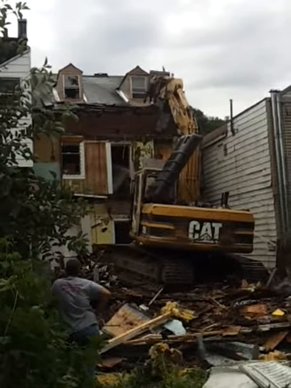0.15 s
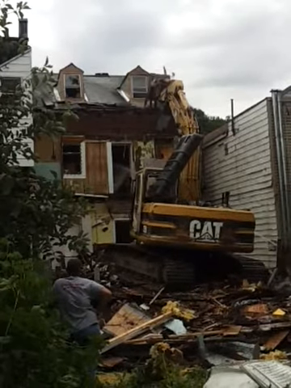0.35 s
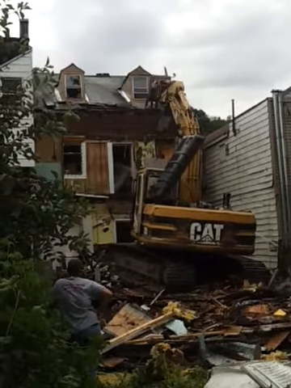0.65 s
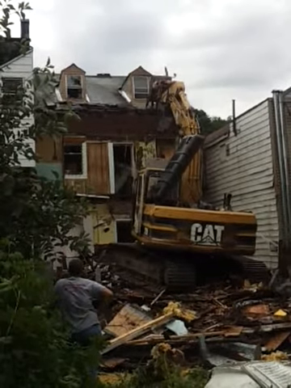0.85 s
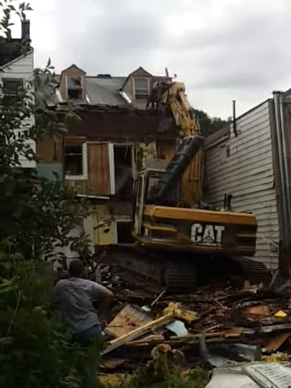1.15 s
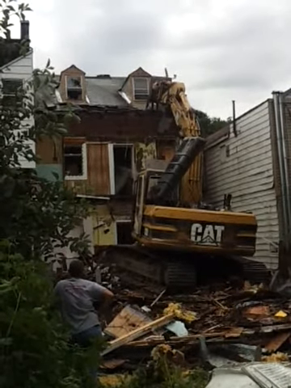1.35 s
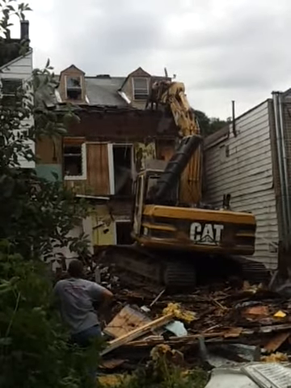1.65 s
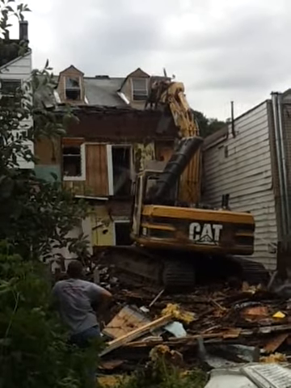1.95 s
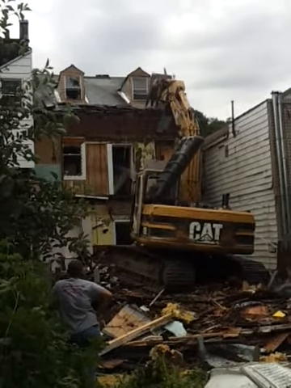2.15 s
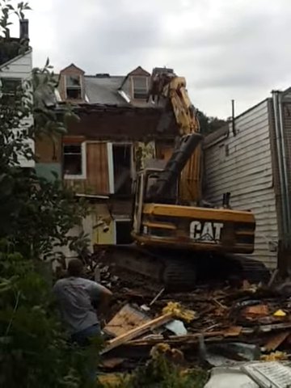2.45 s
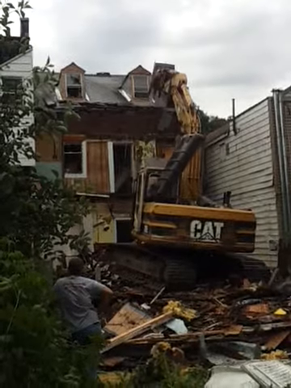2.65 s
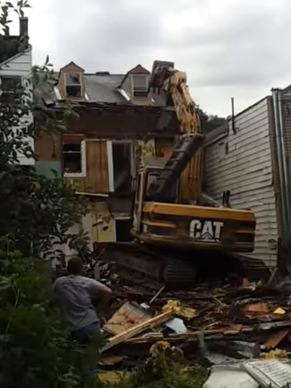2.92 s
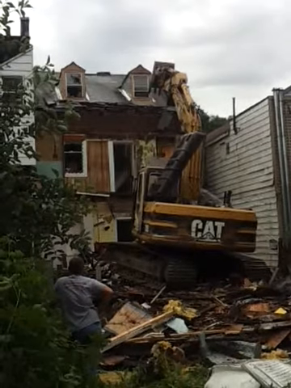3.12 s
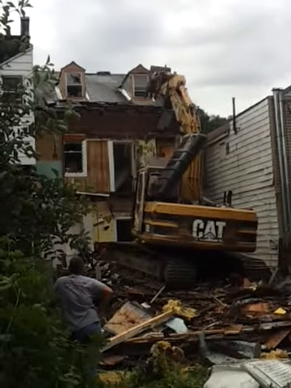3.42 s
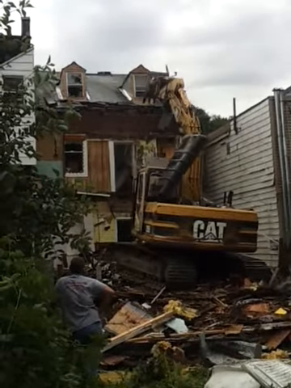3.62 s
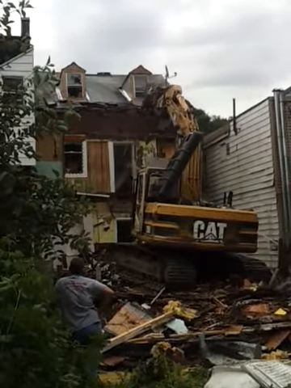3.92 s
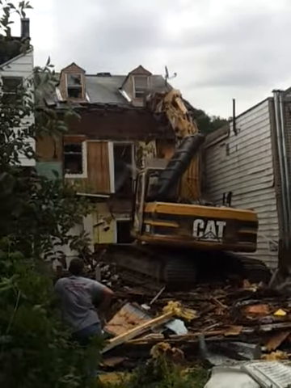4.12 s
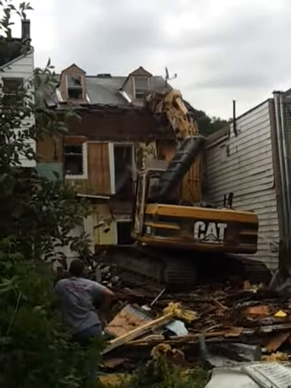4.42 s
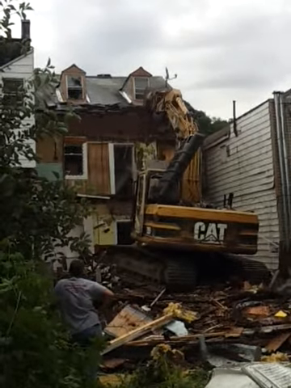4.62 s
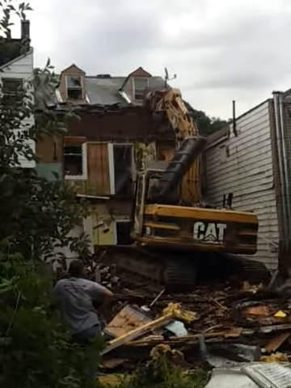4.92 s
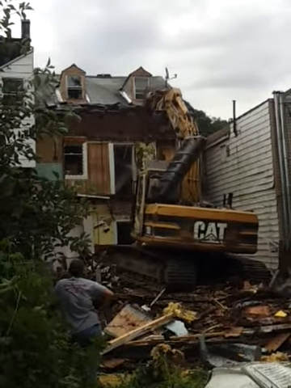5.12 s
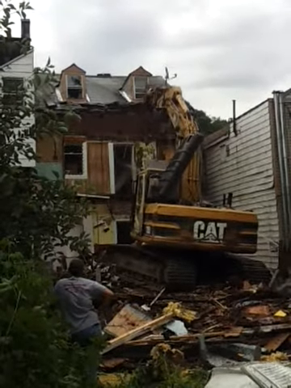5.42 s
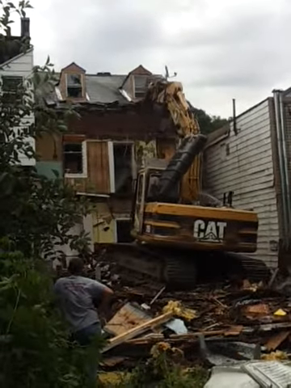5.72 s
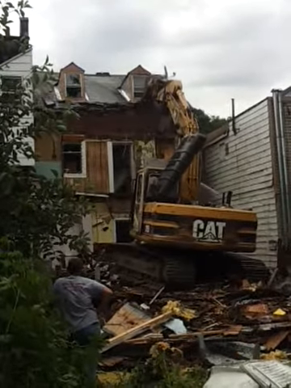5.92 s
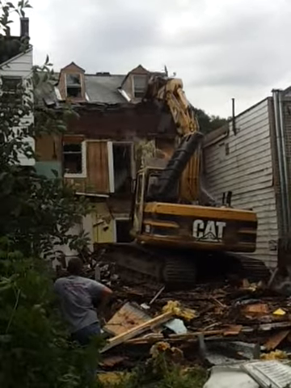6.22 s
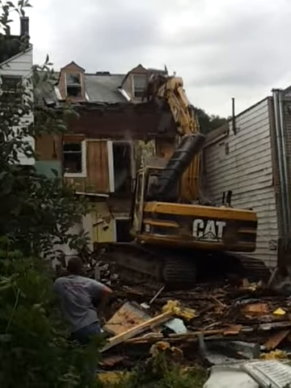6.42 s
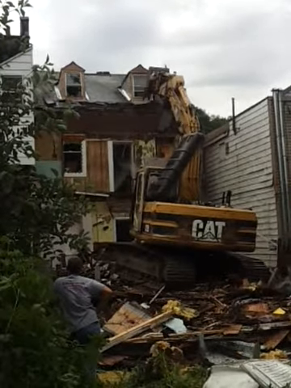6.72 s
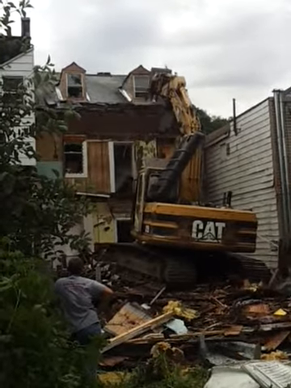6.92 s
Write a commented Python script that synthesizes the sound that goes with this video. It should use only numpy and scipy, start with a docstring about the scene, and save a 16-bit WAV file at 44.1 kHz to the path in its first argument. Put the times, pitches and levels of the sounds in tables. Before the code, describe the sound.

Outdoors, some metres away, a large diesel excavator booms steadily under load, with fan hum, pump whine and oil hiss swelling at each arm movement. A beam cracks early, grit slides, then a dense volley of timber cracks and low thumps hits near four seconds. Smaller cracks and bright snaps follow near six. A handheld phone picks it up in stereo, the peaks clipping.

```python
"""A six-cylinder diesel excavator works beside a timber house, some metres from a phone's two microphone ports.
From the start the exhaust booms at the firing rate, fan and piston pump sing on multiples of the engine cycle,
and oil noise swells with each valve stroke. A beam cracks early; splinters snap and grit slides in the middle,
where the densest cracks come about four seconds in. More cracks and snaps follow, then a last slide of grit.
Tones are sines, rough sounds are coloured noise, beams are decaying modes; the highest peaks clip."""
import sys
import numpy as np
from scipy import signal
from scipy.fft import rfft, irfft, next_fast_len
from scipy.io import wavfile
from scipy.ndimage import uniform_filter1d, map_coordinates

SR = 44100
rng = np.random.default_rng(int(sys.argv[2]) if len(sys.argv) > 2 else 0)


def master_out(mix):
    """Clip the mix to full scale and print it as 16-bit PCM to the path in sys.argv[1]."""
    frames = np.transpose(np.atleast_2d(mix))
    ceiling = np.clip(frames, -1, 1)
    pcm = np.round(ceiling * 32767).astype(np.int16)
    wavfile.write(sys.argv[1], SR, pcm)


N = 311325
TIME = np.arange(N) / SR
FFT_SIZE = next_fast_len(N)
BINS = np.arange(FFT_SIZE // 2 + 1) * SR / FFT_SIZE

CYLINDERS = 6  # firings in one engine cycle
MIDDLING_FLOW_DB = -32  # oil flow at which hiss and roar have their stated levels

# Blows that break the beams.
# Each row: start in seconds, peak level in dB, pitch in Hz, thump level in dB.
CRACKS = [(0.42, -12.5, 1340, -23), (0.437, -12, 744, -15), (0.469, -14, 1220, -14),
          (3.782, -11, 1270, -26), (3.819, -5.5, 990, -27), (3.859, -17, 1290, -34),
          (3.963, -9.5, 1190, -30), (3.99, -15, 1280, -30), (4.068, -11, 900, -22),
          (4.092, -7.5, 1530, -10), (4.115, -6.5, 1540, -22), (4.139, -10.5, 1170, -31),
          (4.159, -8.5, 1080, -20), (4.182, -6, 1300, -16), (4.211, -12.5, 1140, -6.5),
          (4.229, -10, 770, -11), (4.257, -9, 990, -17), (5.607, -15, 1030, -28), (5.743, -12, 729, -35),
          (5.974, -14, 950, -26), (5.989, -8, 1360, -26), (6.027, -17, 1040, -26)]


def undb(db):
    """Decibels to gain."""
    return 10 ** (np.asarray(db) / 20)


def unit(x):
    """Scale to rms 1."""
    return x / np.sqrt(np.mean(x ** 2))


def noise():
    """Unrelated white noise for mid and side."""
    return rng.standard_normal((2, N))


def curve(table):
    """A (seconds, value) table read sample by sample."""
    seconds, values = np.transpose(table)
    return np.interp(TIME, seconds, values)


def shape(table):
    """A (Hz, dB) table read at every frequency, on a log frequency scale."""
    hz, db = np.transpose(table)
    return np.interp(np.log(BINS + 1), np.log(hz), db)


def colour(x, db):
    """Filter by a gain curve in dB."""
    return irfft(rfft(x, FFT_SIZE) * undb(db), FFT_SIZE)[..., :N]


def walk(rate):
    """Random levels held 1 / rate s and slewed twice; spread near 1."""
    hold = int(SR / rate)
    steps = np.repeat(rng.standard_normal(N // hold + 1), hold)
    return 1.95 * uniform_filter1d(uniform_filter1d(steps, hold), hold)[:N]


def tones(cycle, orders, dbs, waver_db, rate):
    """Sines on multiples of the engine cycle, each wavering; the side copy runs a quarter turn off."""
    out = np.zeros((2, N))
    for order, db in zip(orders, dbs):
        turn = 2 * np.pi * (order * cycle + rng.random() + 0.01 * walk(rate))
        level = np.sqrt(2) * undb(db + waver_db * walk(rate))
        out += level * np.array([np.sin(turn), np.cos(turn)])
    return out


def clatter(turns, keep, size=4096):
    """Noise that partly repeats every turn: the same parts knock at the same angles."""
    fresh = rng.standard_normal((2, int(turns[-1]) + 1, size))
    # each turn keeps a share of the pattern before it
    pattern = signal.lfilter([1], [1, -keep], fresh, axis=1).reshape(2, -1)
    return unit(np.array([np.interp(turns * size, np.arange(len(p)), p) for p in pattern]))


def swells(table, column, idle_db, close_s):
    """Level in dB of sounds that open, hold and close over a quiet bed; they add in power."""
    open_s = 0.016
    power = undb(idle_db) ** 2
    for row in table:
        start, end = row[0], row[1]
        # a sound that starts at zero is already open
        corners = [start - (start == 0), start + open_s, end, end + close_s]
        gate = np.interp(TIME, corners, [0, 1, 1, 0])
        power = power + (gate * undb(row[column])) ** 2
    return 10 * np.log10(power)


def add(out, s, sound):
    """Mix a short sound in at time s."""
    k = int(s * SR)
    out[:, k:k + sound.shape[1]] += sound[:, :N - k]


def showers():
    """Small fragments slide off the roof: dense bright grains of grit and shingle as flickering noise."""
    # Each row: start in seconds, end in seconds, level in dB.
    slides = [(2.55, 3.2, -34.5), (3.3, 3.62, -33), (3.72, 4.0, -30.5), (4.06, 4.22, -39),
              (4.55, 4.95, -36), (6.25, 6.5, -35.5)]
    # Spectrum of the grit. Each row: frequency in Hz, relative level in dB.
    grit = [(2000, 5), (4000, -1.5), (7500, 2), (10500, -1), (12400, -5), (14500, -19)]
    grains = undb(1.4 * walk(120)) * noise()
    level_db = swells(slides, column=2, idle_db=-46, close_s=0.17)
    return undb(level_db) * unit(colour(grains, shape(grit)))


def debris():
    """After each crack, falling pieces crunch: flickering noise that rises fast and dies away."""
    # Spectrum of the crunch. Each row: frequency in Hz, relative level in dB.
    spectrum = [(20, 7), (60, 9), (120, 1), (300, 7), (1500, 5), (1800, -15), (2300, -8.5), (4000, -19.5),
                (8000, -26), (12000, -44)]
    below_crack_db, t60_s, rise_s = -8.5, 0.25, 0.0023
    power, t = np.zeros((2, N)), TIME[:16384]
    for s, db, _, _ in CRACKS:
        fall = undb(db + below_crack_db) * 1000 ** (-t / t60_s)
        # unrelated falls add in power
        add(power, s, np.tile(fall ** 2 * (1 - np.exp(-t / rise_s)), (2, 1)))
    grains = unit(undb(2.0 * walk(150)) * noise())
    tint = shape(spectrum)
    return colour(np.sqrt(power) * grains, tint) / np.sqrt(np.mean(undb(tint) ** 2))


def snaps():
    """Splinters and glass: short bright bursts of band-limited noise with a tail."""
    # Each row: start in seconds, level in dB before the band filter, pitch in Hz, 60 dB decay in seconds.
    bursts = [(2.1894, -22, 6670, 0.09), (2.9494, -28, 7000, 0.092), (3.4955, -26, 10000, 0.084),
              (3.7994, -22, 7350, 0.1), (3.8594, -28, 8560, 0.1), (4.1094, -28, 7100, 0.1),
              (5.6094, -19.5, 7380, 0.08), (5.88, -18, 7380, 0.088), (5.8964, -19, 7380, 0.09)]
    out, t = np.zeros((2, N)), TIME[:8192]
    for s, db, hz, t60 in bursts:
        edges = np.clip([hz / 4.3, hz * 1.46], 100, .45 * SR)
        band = signal.butter(3, edges, "band", fs=SR, output="sos")
        burst = signal.sosfilt(band, rng.standard_normal((2, len(t))))
        add(out, s, undb(db) * burst * 1000 ** (-t / t60) * (1 - np.exp(-t / 0.0018)))
    return out


def cracks():
    """Fibres tear for some milliseconds and ring the beam's decaying modes, with a low thump below."""
    # Modes of the beams. Each row: frequency in Hz, 60 dB decay in seconds.
    timber = [(430, 0.14), (620, 0.017), (770, 0.17), (1030, 0.034), (1180, 0.096), (1320, 0.11),
              (1540, 0.036)]
    spread_db = -10  # per octave between a mode and the pitch of the blow
    scatter = .025  # each broken piece is tuned a little differently
    out, t = np.zeros((2, N)), TIME[:16384]
    mode_hz, t60 = (c[:, None] for c in np.transpose(timber))
    for s, db, hz, thump_db in CRACKS:
        tear = rng.standard_normal((2, 1024)) * np.exp(-t[:1024] / 0.0053)
        # each blow wakes most the modes near its own pitch
        mode_db = spread_db * np.abs(np.log2(mode_hz / hz))
        piece_hz = mode_hz * (1 + scatter * rng.standard_normal(mode_hz.shape))
        modes = undb(mode_db) * np.sin(2 * np.pi * piece_hz * t) * 1000 ** (-t / t60)
        ring = signal.fftconvolve(tear, modes.sum(axis=0)[None])[:, :len(t)]
        ring /= np.abs(ring).max(axis=1, keepdims=True)
        thump = np.sin(2 * np.pi * rng.uniform(170.6, 222) * t)
        thump *= 1000 ** (-t / 0.1) * (1 - np.exp(-t / 0.0025))
        add(out, s, undb(db) * ring + undb(thump_db) * thump)
    return out


def strokes(column, idle_db):
    """Level in dB of one pump or oil sound as valves open and close to move the arm."""
    # Each row: opens in seconds, closes in seconds, then levels in dB of the pump whine, the oil flow
    # and the tenth piston tone.
    valves = [(0, .09, -34, -28.5, -45), (.11, .21, -32, -30, -39), (.21, .3, -40, -38, -45),
              (.3, .65, -35, -31, -45), (.79, 1.01, -28.5, -26.5, -43), (1.06, 1.24, -31.5, -30, -41),
              (1.24, 1.38, -43, -43, -41), (1.75, 1.81, -40, -51, -48), (1.97, 2.55, -31.5, -35.5, -44),
              (2.49, 2.76, -28, -32, -46), (2.59, 2.76, -33, -28, -46), (2.76, 2.86, -44, -35, -48),
              (3.19, 3.31, -29.5, -31, -41), (3.37, 3.63, -36, -38.5, -43), (4.06, 4.2, -42, -26.5, -48),
              (4.27, 4.48, -27, -34, -43), (4.48, 4.79, -32.5, -28.5, -52), (4.91, 5.74, -32, -33.5, -45),
              (5.8, 6.4, -33.5, -35, -52), (6.42, 7.06, -33, -27, -48), (6.48, 6.8, -45, -40, -34.5),
              (6.92, 7.06, -31, -38, -37)]
    return swells(valves, column, idle_db, close_s=.045)


def covers(whine_db):
    """Machine covers ring as narrow noise bands, a little harder while the pump whines."""
    # Each row: frequency in Hz, width in Hz, level in dB.
    panels = [(3368, 40, -43), (6260, 200, -42)]
    rings = np.zeros((2, N))
    for hz, width, db in panels:
        peak_db = -20 * np.log10(1 + (2 * (BINS - hz) / width) ** 2)
        rings += undb(db) * unit(colour(noise(), peak_db))
    return undb(0.17 * (whine_db - whine_db.mean())) * rings


def oil_hiss(flow_db):
    """Oil hisses through the valves: bright noise that grows gently with flow."""
    # Spectrum of the hiss. Each row: frequency in Hz, relative level in dB.
    spectrum = [(2000, -2.5), (4000, 5), (5500, -0.5), (6800, 2.5), (7600, 3.5), (8500, -0.5), (10500, -3),
                (11600, -5), (12400, -13), (14500, -67)]
    hiss_db, slope = -31.5, 0.28  # at middling flow; dB per dB of flow
    level_db = hiss_db + slope * (flow_db - MIDDLING_FLOW_DB) + 0.17 * walk(16)
    return undb(level_db) * unit(colour(noise(), shape(spectrum)))


def oil_flow(cycle, flow_db):
    """Oil noise partly repeats each shaft turn, with pressure ripple tones; both grow with flow."""
    # Spectrum of the flow noise. Each row: frequency in Hz, relative level in dB.
    spectrum = [(1700, -5.5), (2000, 8), (2300, 10.5), (3000, 5), (3900, -3), (4500, -21), (6000, -39)]
    # Ripple tones, as multiples of the engine cycle.
    ripple_orders = [72, 132, 140, 146, 152, 156, 162]
    # Level of each ripple tone, in dB relative to the flow noise.
    ripple_db = [-15.5, -19.5, -20, -9, -23, -18, -19]
    rough = clatter(cycle * 2, 0.71, size=2048) + undb(2.0) * noise()
    ripple = tones(cycle, ripple_orders, ripple_db, 2.6, 6)
    return undb(flow_db) * (unit(colour(rough, shape(spectrum))) + ripple)


def pump_whine(cycle, load_db, whine_db):
    """One high pump tone beats once a shaft turn; the beat fades as load drops or the whine grows loud."""
    order, depth = 144, 0.62
    load_share = 7.9  # dB of beat per dB of load
    steady_db = -30  # above this the whine steadies
    beat = np.sin(2 * np.pi * (2 * cycle + 0.061 * walk(5)))
    fade_db = load_share * load_db - 2 * np.maximum(whine_db - steady_db, 0)
    throb = 1 + depth * undb(fade_db) * beat
    return throb * undb(whine_db) * tones(cycle, [order], [0], 1.05, 14)


def pump_pistons(cycle):
    """The pump's pistons sing their first, third and tenth harmonics, each with its own level."""
    # First piston tone. Each row: time in seconds, level in dB.
    first = [(0.0, -26), (0.35, -21), (0.57, -29), (0.71, -18.5), (1.26, -25.5), (1.51, -18), (1.85, -28),
             (2.26, -20), (2.36, -25), (2.79, -20.5), (2.87, -28), (3.85, -20), (4.29, -27), (4.42, -21.5),
             (4.93, -29), (6.84, -24), (7.02, -19.5), (7.06, -25)]
    # Third piston tone. Each row: time in seconds, level in dB.
    third = [(0.0, -25), (0.25, -35), (0.84, -27), (1.75, -35.5), (2.54, -27), (3.15, -38), (3.24, -29),
             (4.05, -36), (4.11, -28), (4.36, -39), (4.54, -32), (4.99, -35), (5.07, -49), (5.19, -31),
             (5.76, -40), (6.21, -31), (6.68, -37), (7.06, -30)]
    piston_order = 18  # multiple of the engine cycle
    tenth_db = strokes(column=4, idle_db=-45)
    pistons = undb(curve(first)) * tones(cycle, [piston_order], [0], 1.17, 9)
    pistons += undb(curve(third)) * tones(cycle, [3 * piston_order], [0], 0.95, 12)
    pistons += undb(tenth_db) * tones(cycle, [10 * piston_order], [0], 1.3, 9.8)
    return pistons


def hydraulics(cycle, load_db, flow_db):
    """Pump and oil sounds together, with the covers they share."""
    whine_db = strokes(column=2, idle_db=-48)
    pump = pump_pistons(cycle) + pump_whine(cycle, load_db, whine_db)
    return pump + oil_flow(cycle, flow_db) + oil_hiss(flow_db) + covers(whine_db)


def load(firing_hz):
    """Load in dB: when it drops the engine runs up and fuel is cut a moment later."""
    loaded_hz, unload_db_per_hz2, fuel_lag_s = 92.5, -1.9, 0.034  # loaded_hz: firing rate at full load
    late_hz = np.interp(TIME - fuel_lag_s, TIME, firing_hz)
    return unload_db_per_hz2 * (late_hz - loaded_hz) ** 2


def fan(cycle, load_db):
    """The fan sings one multiple of the engine cycle, softer as the load drops."""
    order, full_load_db, share = 21, -21.5, 2.4  # share: dB per dB of load
    return undb(share * load_db) * tones(cycle, [order], [full_load_db], 1.0, 6.5)


def block_hum(cycle, load_db):
    """The engine block hums a set of wavering tones, softer as the load drops."""
    # Block tones, as multiples of the engine cycle.
    orders = [3, 4, 12, 16, 24, 36, 60, 63, 69, 84, 87, 108]
    # Level of each block tone at full load, in dB.
    levels = [-41, -46, -65, -39.5, -38.5, -47, -41.5, -42, -39.5, -36.5, -37, -40]
    share = .7  # dB per dB of load
    return undb(share * load_db) * tones(cycle, orders, levels, 2.2, 6)


def roar(cycle, flow_db):
    """Valve gear clatter and steady noise make a roar that partly repeats each engine cycle."""
    # Spectrum of the roar. Each row: frequency in Hz, relative level in dB.
    spectrum = [(20, -4), (60, 5.5), (150, 3), (300, 2.5), (450, 0.5), (560, -2.5), (1100, -3.5),
                (1300, -2.5), (1500, -4), (1680, -7), (1800, -20), (2400, -13.5), (5000, -47)]
    roar_db, slope = -19.5, 0.034  # at middling flow; dB per dB of flow
    rough = clatter(cycle, 0.55) + undb(-3.0) * noise()
    level_db = roar_db + slope * (flow_db - MIDDLING_FLOW_DB)
    return undb(level_db) * unit(colour(rough, shape(spectrum)))


def exhaust_boom(cycle, load_db):
    """The exhaust booms once for each firing, loudest at full load."""
    return undb(-6.5 + load_db) * tones(cycle, [CYLINDERS], [0], 0.2, 12)


def engine(cycle, load_db, flow_db):
    """Fan, block, roar and exhaust, all turning with the same engine cycle."""
    background = fan(cycle, load_db) + block_hum(cycle, load_db) + roar(cycle, flow_db)
    return background + exhaust_boom(cycle, load_db)


def scene():
    """Sum each source as a mid and a side sound; the side is weak in the bass and strong in the treble."""
    # The governor hunts as the load changes. Each row: time in seconds, firing rate in Hz.
    speed = [(0, 92.6), (.32, 92.8), (.5, 92.45), (.72, 92.9), (.92, 92.45), (1.2, 92.95), (2.1, 92.5),
             (2.38, 92.8), (2.78, 92.4), (3.05, 93.1), (3.33, 93.4), (3.55, 92.5), (3.8, 92.95),
             (4.05, 92.7), (4.3, 93.9), (4.55, 93.05), (5.15, 92.62), (6.3, 92.75), (6.6, 92.45),
             (6.82, 92.55), (7.06, 92.95)]
    # Stereo spread. Each row: frequency in Hz, side minus mid in dB.
    sides = [(25, -19), (60, -35), (110, -30), (200, -20), (370, -17.5), (680, -11.5), (1250, -10.5),
             (2290, -6), (4210, -2), (7730, 1.5), (14200, -6)]
    firing_hz = curve(speed)
    cycle = np.cumsum(firing_hz) / CYLINDERS / SR  # engine cycles since the start
    load_db = load(firing_hz)
    flow_db = strokes(column=3, idle_db=-35.5)
    house = showers() + debris() + snaps() + cracks()
    machine = hydraulics(cycle, load_db, flow_db) + engine(cycle, load_db, flow_db)
    mid, side = house + machine
    side = colour(side, shape(sides))
    return np.array([mid + side, mid - side])


def record(dry):
    """The two microphone ports colour the treble differently; the peaks clip; the top is cut."""
    # Each row: frequency in Hz, left minus right in dB.
    ports = [(100, -0.1), (1700, 0), (2200, 7), (2800, -6.5), (3400, -11), (4000, 0), (5500, -8.5),
             (6300, -5.5), (7600, -3.5), (8500, 3), (10500, 3.5), (14500, 10)]
    port_lag_s, top_hz = 3.4e-5, 14550  # the right port hears later
    left, right = colour(dry, np.array([[.5], [-.5]]) * shape(ports))
    right = map_coordinates(right, [(TIME - port_lag_s) * SR], order=5, mode="mirror")
    clipped = np.clip([left, right], -1, 1)
    return signal.sosfilt(signal.ellip(12, .1, 80, top_hz, fs=SR, output="sos"), clipped)


dry = scene()
out = record(dry)
master_out(out)
```